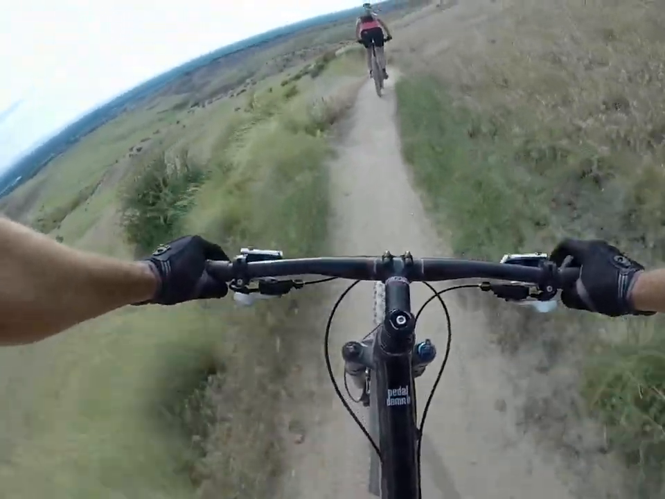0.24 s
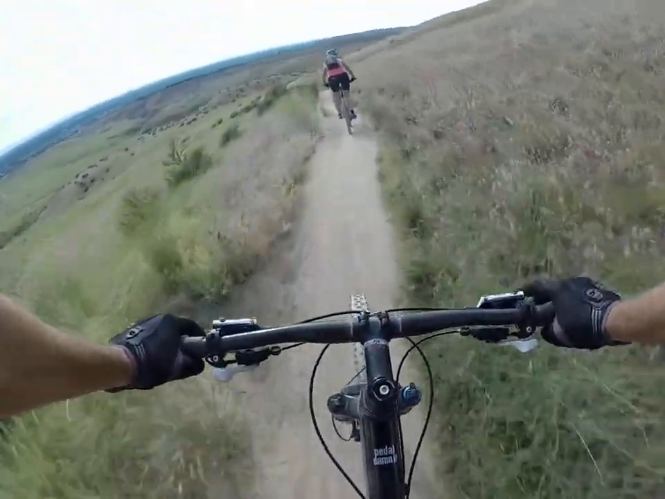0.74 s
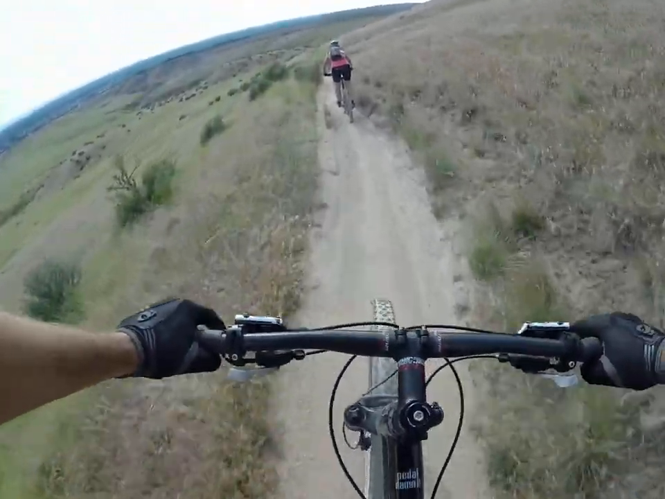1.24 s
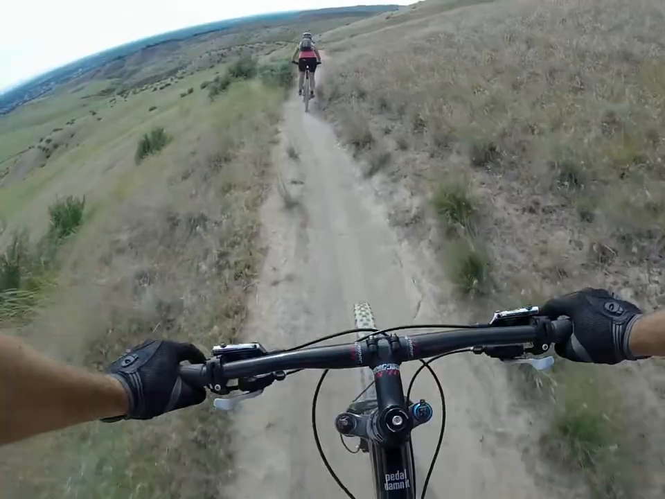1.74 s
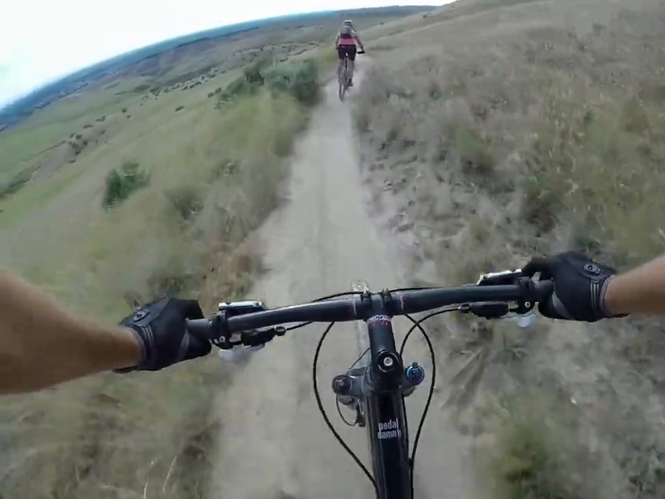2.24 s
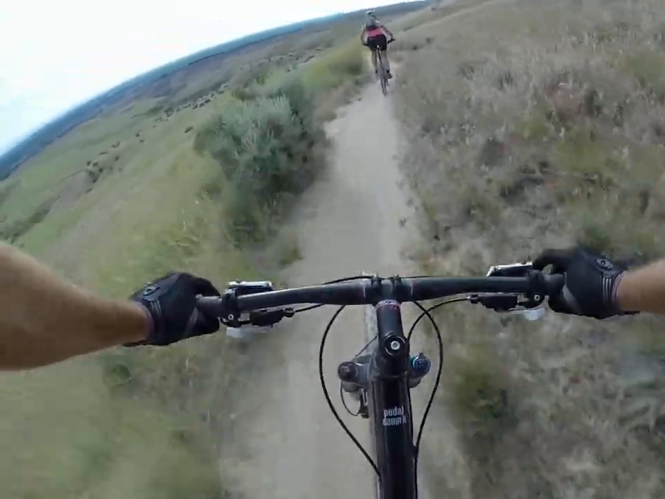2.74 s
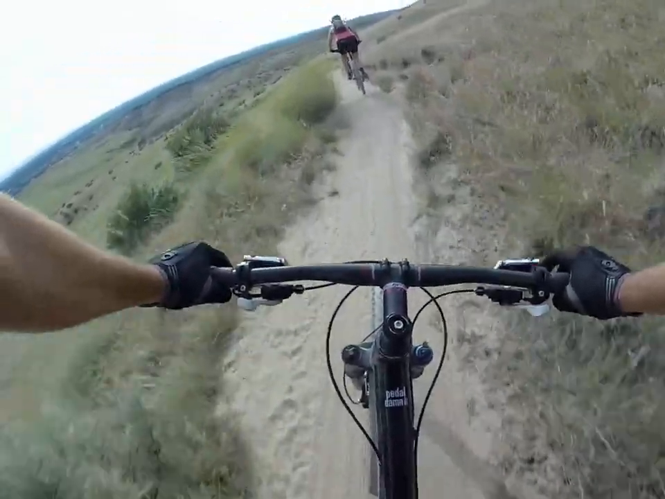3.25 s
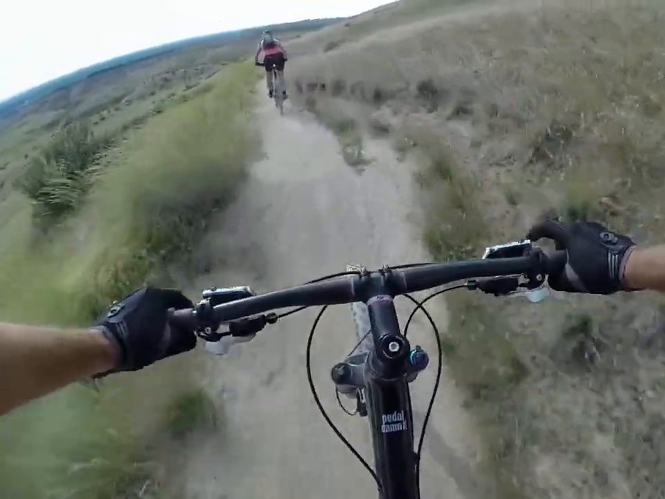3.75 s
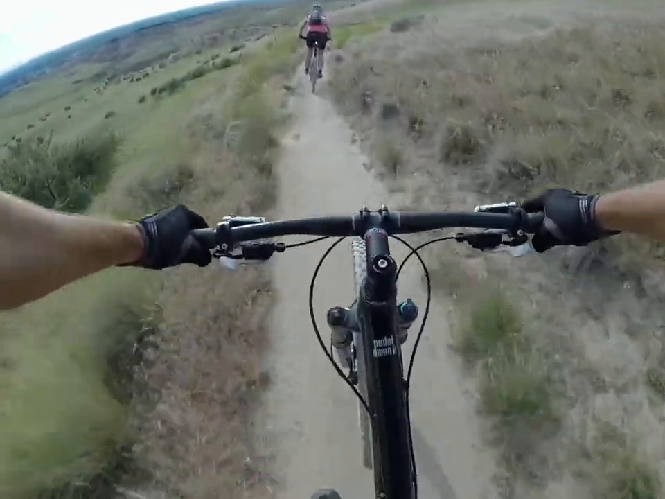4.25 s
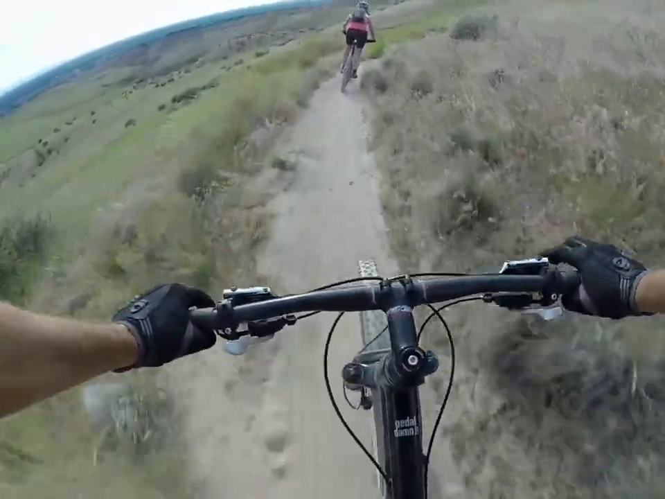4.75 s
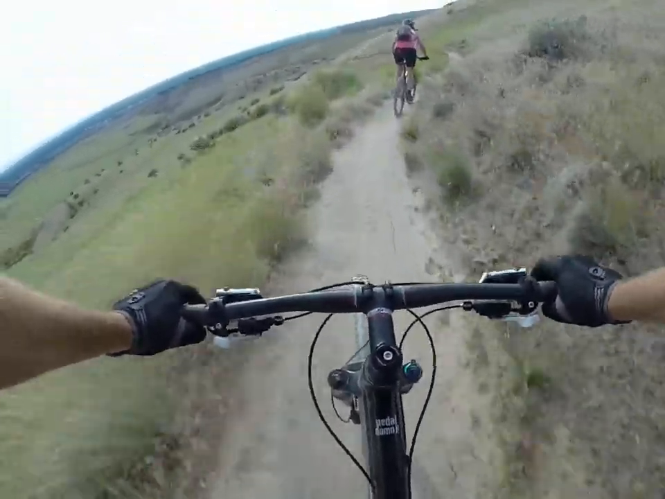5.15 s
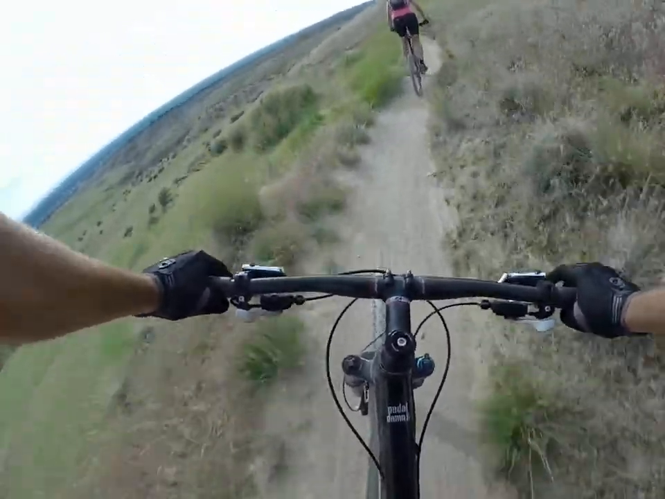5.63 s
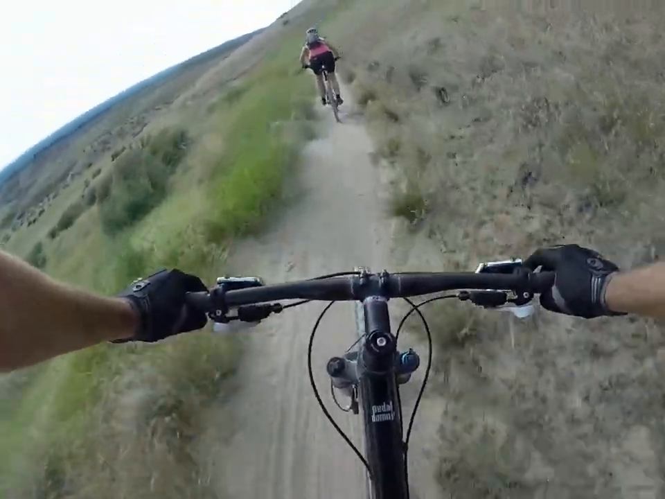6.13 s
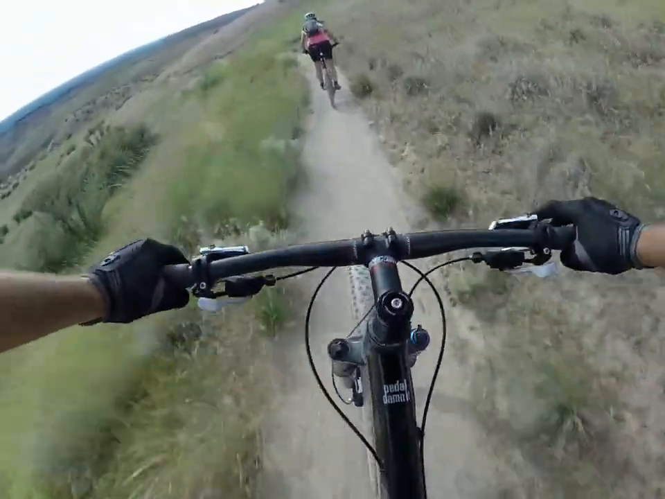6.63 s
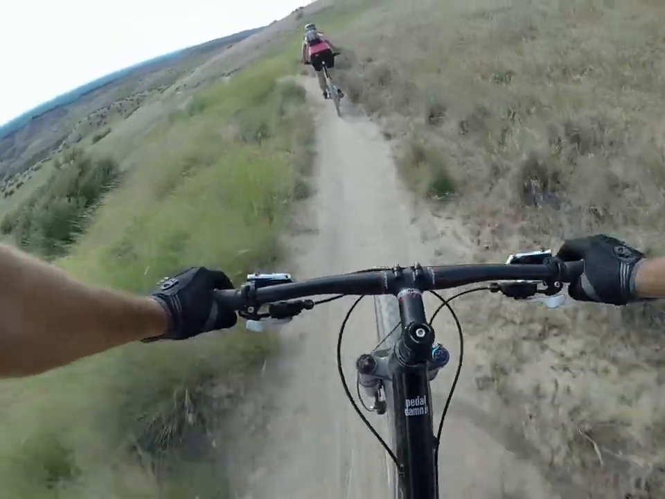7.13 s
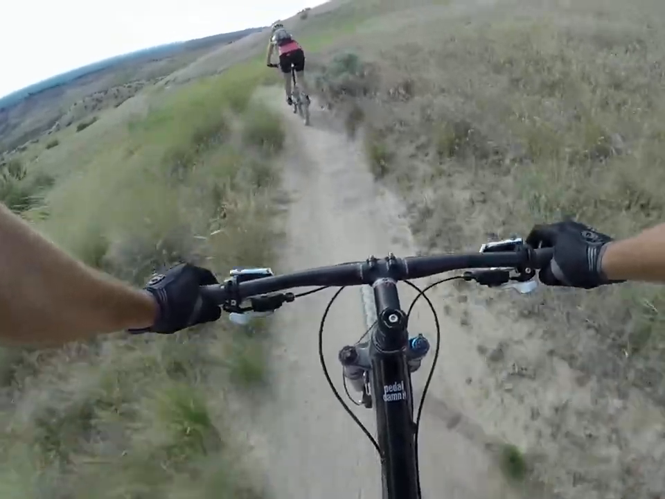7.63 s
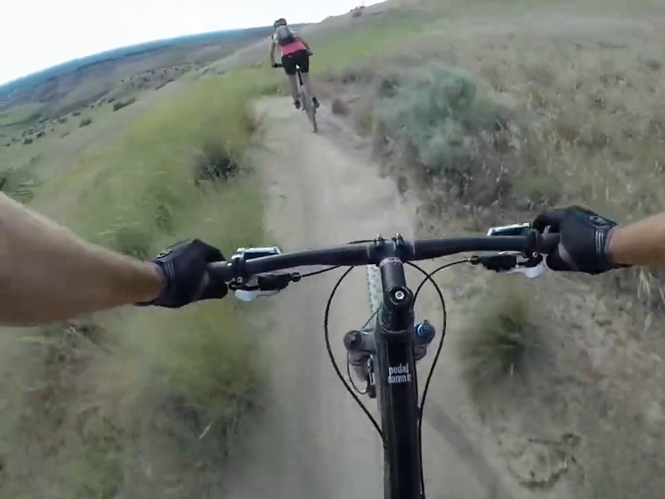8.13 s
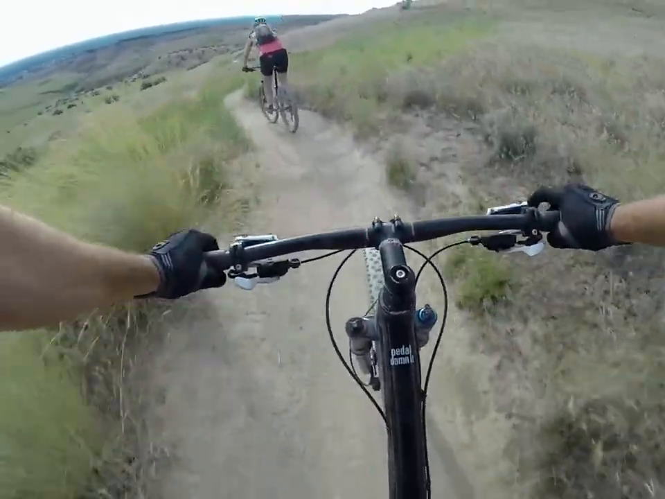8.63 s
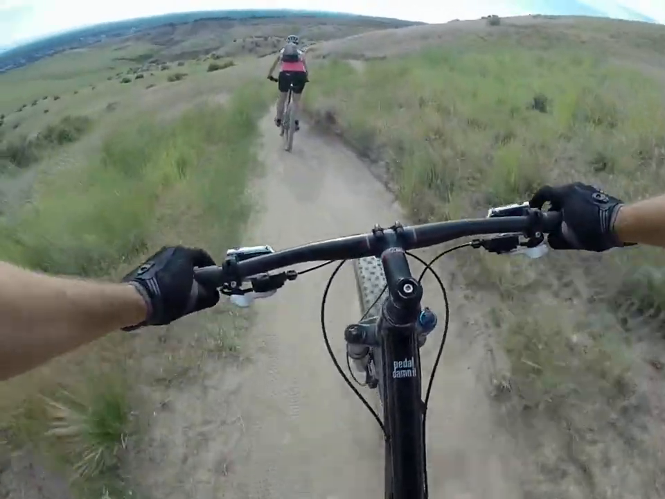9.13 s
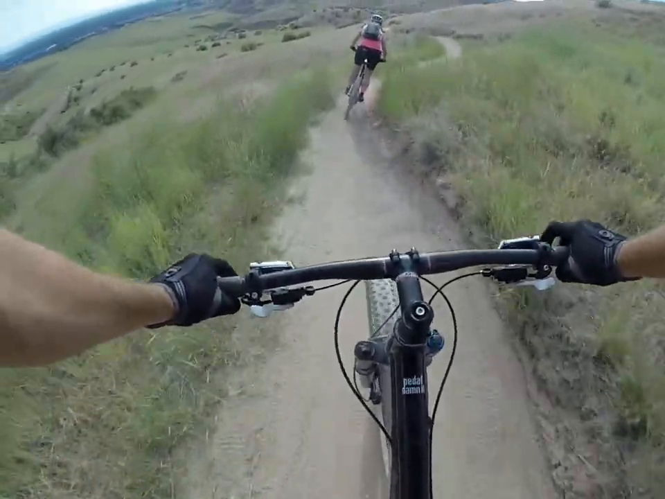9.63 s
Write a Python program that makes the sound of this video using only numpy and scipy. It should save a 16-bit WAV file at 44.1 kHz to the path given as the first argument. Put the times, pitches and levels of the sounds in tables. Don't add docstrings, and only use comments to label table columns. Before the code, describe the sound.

Wind thumps a chest-worn microphone as knobby tyres grind over dry dirt, a freehub ticks fast, and disc brakes squeal in throbbing clusters.

```python
import sys
import numpy as np
from scipy import signal
from scipy.fft import rfft, irfft, next_fast_len
from scipy.io import wavfile

SR = 44100
rng = np.random.default_rng(int(sys.argv[2]) if len(sys.argv) > 2 else 0)


def materialize(psi):
    bounded = np.clip(np.atleast_2d(psi).T, -1, 1)
    quanta = np.round(bounded * 32767).astype(np.int16)
    wavfile.write(sys.argv[1], SR, quanta)


def convert_level_to_amplitude(level_db):
    exponent = np.asarray(level_db, float) / 20
    return 10 ** exponent


N = 435708

# (time [s], rate [clicks/s])
WHEEL_CLICKS = [(0, 77), (1.05, 84), (2.2, 115), (3.2, 79), (3.9, 96), (4.6, 82), (5.1, 94), (5.8, 83),
                (6.6, 78), (7.3, 71), (7.8, 101), (8.5, 80), (9.3, 45), (9.88, 71)]


def rms_one(x):
    return x / np.sqrt(np.mean(x ** 2) + 1e-20)


def in_time(rows):
    s, *columns = np.transpose(rows)
    return [np.interp(np.arange(N) / SR, s, c) for c in columns]


def slow_time():
    return np.arange(0, N + 64, 64) / SR


def every_sample(control):
    return np.interp(np.arange(N) / SR, slow_time(), control)


def drift(rate, count=N):
    r = np.exp(-40 * np.pi * rate / SR)
    noise = rng.standard_normal(count // 20 + 2002)
    slow = signal.lfilter([1], [1, -2 * r, r * r], noise)[2000:]
    return np.interp(np.arange(count) / 20, np.arange(len(slow)), rms_one(slow))


def colour(x, spectrum):
    hz, db = np.transpose(spectrum)
    size = next_fast_len(len(x))
    bins_hz = np.arange(size // 2 + 1) * SR / size + 1e-3
    gain = convert_level_to_amplitude(np.interp(np.log(bins_hz), np.log(hz), db, left=-90, right=-90))
    return rms_one(irfft(rfft(x, size) * gain, size)[:len(x)])


def butter(x, order, hz, kind="low"):
    return signal.sosfilt(signal.butter(order, hz, kind, fs=SR, output="sos"), x)


def ring(clicks, hz, t60):
    r, w = convert_level_to_amplitude(-60 / (t60 * SR)), 2 * np.pi * hz / SR
    return signal.lfilter([0, np.sin(w)], [1, -2 * r * np.cos(w), r * r], clicks + 1e-18)


def resonance(x, hz, width):
    r, w = np.exp(-np.pi * width / SR), 2 * np.pi * hz / SR
    return signal.lfilter([(1 - r * r) / 2, 0, (r * r - 1) / 2], [1, -2 * r * np.cos(w), r * r], x)


def bursts(rows, attack_s, release_s):
    t, out = np.arange(N) / SR, np.zeros(N)
    for s, length, db in rows:
        span = slice(round(s * SR), round((s + length + 8 * release_s) * SR))
        age = t[span] - s
        rise = np.clip(age / attack_s, 0, 1) ** 2
        out[span] += convert_level_to_amplitude(db) * rise * np.exp(-np.maximum(age - length, 0) / release_s)
    return out


def puffs(rows, tone, rise_s):
    shape = np.zeros(N)
    for s, db, t60 in rows:
        t = np.arange(round(t60 * SR)) / SR
        at = round(s * SR)
        shape[at:at + len(t)] += convert_level_to_amplitude(db - 60 * t / t60) * (1 - np.exp(-t / rise_s))
    return shape * colour(rng.standard_normal(N), tone)


def grip_db():
    # (time [s], level [dB])
    bite_rows = [(0.0, -56.5), (0.36, -56), (1.32, -61), (1.51, -57.5), (2.61, -53), (2.92, -54.5),
                 (3.22, -54), (4.37, -61), (4.54, -54.5), (4.81, -57.5), (5.47, -52.5), (6.3, -53.5),
                 (6.63, -57.5), (7.13, -58), (8.2, -49.5), (8.36, -57), (8.72, -55), (9.88, -56.5)]
    # (time [s], change [dB], half length [s])
    bump_rows = [(0.206, 0.5, 0.03), (0.71, 3, 0.081), (0.837, 0.5, 0.035), (1.2, -2.5, 0.091),
                 (1.4, 3.5, 0.059), (2.107, 0, 0.026), (2.522, 1.5, 0.057), (3.604, 2.5, 0.024),
                 (3.858, -4, 0.026), (4.268, -5.5, 0.054), (4.41, 8, 0.057), (4.814, 3, 0.049),
                 (5.434, 0.5, .04), (6.06, 1.5, 0.053), (6.548, 0, 0.034), (6.951, 2.5, 0.23),
                 (7.437, 2.5, 0.061), (8.296, 4.5, 0.066), (8.366, 5.5, 0.016), (8.753, -4, 0.081),
                 (9.555, 2, 0.038)]
    t = slow_time()
    bump_db = sum(db * np.exp(-((t - s) / half) ** 2) for s, db, half in bump_rows)
    return in_time(bite_rows)[0], every_sample(bump_db)


def wind():
    # (time of the top [s], peak [dB], rise [s per 10 dB], fall [s per 10 dB])
    gust_rows = [(0.02, -33, 0.18, 1), (0.9, -25, 0.12, 0.1), (2.319, -28.5, 0.18, 0.12),
                 (3.05, -33.5, 0.22, 0.5), (3.36, -31, 0.27, 0), (3.99, -33, 0.16, 0.3),
                 (4.531, -30.5, 0.066, 0.24), (5.23, -21, 0.21, 0.47), (5.6, -23, 0.39, 0.14),
                 (6.99, -34.5, 0.46, 0.3), (7.55, -31.5, 0.18, 1), (8.06, -18.5, 0.086, 0.2),
                 (8.27, -17.5, 0.15, 0.22), (8.62, -30, 0.15, 0.24), (9.24, -23, 0.23, 0.2),
                 (9.5, -32.5, 0.24, 0.5)]
    # (time [s], level [dB])
    airflow_rows = [(0.0, -44.5), (0.38, -51.5), (0.72, -46), (1.38, -49.5), (1.56, -47), (2.53, -46.5),
                    (3.33, -50.5), (3.58, -48), (5.03, -48.5), (5.61, -46), (6.44, -50), (6.88, -50),
                    (7.24, -55), (7.57, -48), (8.2, -49), (8.56, -51), (9.71, -53.5), (9.88, -51.5)]
    # (frequency [Hz], density [dB/Hz])
    buffet_tone = [(7.1, -16), (12, 1.5), (31, 5), (41, -15), (54, -11.5), (120, -30), (160, -48),
                   (260, -120)]
    rush_tone = [(24, -15.5), (40, -2), (54, -8), (103, -11.5), (283, -21.5), (606, -34.5), (726, -33),
                 (1100, -42.5), (1430, -41.5), (2420, -120)]
    flap_tone = [(40, -23), (60, 5), (120, -13), (200, -25)]
    calm_db = -48
    t = slow_time()
    gusts = 0
    for s, db, rise, fall in gust_rows:
        with np.errstate(divide="ignore", invalid="ignore"):
            away = np.maximum((s - t) / rise, (t - s) / fall)
        gusts = gusts + convert_level_to_amplitude(db - 10 * away) ** 2
    buffet_db = every_sample(10 * np.log10(convert_level_to_amplitude(calm_db) ** 2 + gusts))
    rush_db = in_time(airflow_rows)[0] + 4.2 + 0.7 * grip_db()[1]
    flap_db = -41.0 + 1.1 * (buffet_db + 19.0)
    buffet = colour(rng.standard_normal(N), buffet_tone) * convert_level_to_amplitude(buffet_db + 5.0 + 0.92 * drift(6.0))
    rush = colour(rng.standard_normal(N), rush_tone) * convert_level_to_amplitude(rush_db + 4.0 + 1.54 * drift(11.5))
    flap = colour(rng.standard_normal(N), flap_tone) * convert_level_to_amplitude(flap_db + 2.0 * drift(17))
    return buffet + rush + flap


def tyres():
    # (frequency [Hz], width [Hz], level [dB])
    frame_modes = [(1597, 196, -5), (2270, 286, -0.5), (2694, 280, -8), (3173, 153, -8), (3730, 127, -6.5),
                   (4247, 236, -6.5), (4947, 276, -8), (5730, 360, -11), (7040, 1400, -18),
                   (7780, 170, -45.5)]
    # (frequency [Hz], density [dB/Hz])
    bed_tone = [(400, -14.5), (900, -11.5), (1300, -17), (3000, -9.5), (6600, -18), (9000, -43),
                (10500, -41), (12000, -60)]
    grind_mean_db, grind_follows = -56.5, 0.45
    grind_db_per_octave = 3
    slow_db, bump_db = grip_db()
    speed = in_time(WHEEL_CLICKS)[0]
    grind_db = grind_mean_db + grind_follows * (slow_db - slow_db.mean())
    grind_db = grind_db + grind_db_per_octave * np.log2(speed / speed.mean()) + bump_db + 0.54 * drift(4.7)
    hiss_db = slow_db + bump_db - 1.5 + 0.56 * drift(4)
    roughness = drift(29)
    sizes = convert_level_to_amplitude(3.5 * np.minimum(rng.exponential(1, N), 4.5)) * rng.choice([-1, 1], N)
    grains = 0.5 * rms_one((rng.random(N) < 1500 / SR) * sizes)
    grit = (rng.standard_normal((2, N)) + grains) * convert_level_to_amplitude(0.92 * roughness)
    low, high = 0, 0
    for k, (hz, width, db) in enumerate(frame_modes):
        mode = resonance(grit[k % 2], hz, width) * convert_level_to_amplitude(db + 1.5 * drift(15.0))
        if k < 4:
            low = low + mode
        else:
            high = high + mode
    high = butter(high, 4, 8300)
    low = butter(low, 2, 6000)
    bed = colour(rng.standard_normal(N), bed_tone) * convert_level_to_amplitude(-16 + 0.5 * roughness)
    grind = convert_level_to_amplitude(grind_db + 23) * (low + butter(bed, 2, 3400))
    hiss = convert_level_to_amplitude(hiss_db + 18.5) * (high + butter(bed, 2, 3400, "high"))
    return grind + hiss


def freehub():
    # (frequency [Hz], level [dB], t60 [s])
    pawl_modes = [(5785, 3, 0.0085), (7480, 8, 0.0057), (8350, -5.5, 0.0093), (9310, -8, 0.0079),
                  (11170, -14, 0.0054)]
    teeth = np.cumsum(in_time(WHEEL_CLICKS)[0] * (1 + 0.02 * drift(30))) / SR
    clicks = (np.diff(np.floor(teeth), prepend=0) > 0) * convert_level_to_amplitude(2.2 * rng.standard_normal(N))
    slide = np.exp(-1 / (0.0013 * SR))
    burst = signal.lfilter([1], [1, -2 * slide, slide ** 2], clicks) * rng.standard_normal(N)
    pawls = sum(convert_level_to_amplitude(db) * ring(ring(burst, hz, t60), hz, t60) for hz, db, t60 in pawl_modes)
    return convert_level_to_amplitude(sum(grip_db()) - 7.5) * rms_one(pawls)


def cassette():
    # (start [s], length [s], level [dB])
    squeak_rows = [(0.24, 0.058, -55), (0.63, .06, -60), (0.888, 0.084, -55), (1.578, 0.035, -43),
                   (1.635, .04, -54), (1.69, .055, -48.5), (1.815, .11, -45), (1.945, 0.046, -48.5),
                   (2.018, 0.059, -48), (2.08, .03, -55), (5.66, 0.17, -55.5), (6.895, .025, -50)]
    squeak_hz, sweep_hz, slips_per_s = 3176, 230, 68
    slip = np.cumsum(slips_per_s * (1 + 0.17 * drift(20))) / SR % 1
    loose = bursts(squeak_rows, attack_s=0.008, release_s=0.013)
    swell = np.sin(np.pi * slip) * convert_level_to_amplitude(2.0 * drift(40))
    pitch_hz = squeak_hz + sweep_hz * (slip - 0.5) + 35 * drift(25.1)
    squeak = rms_one(swell * np.sin(2 * np.pi * np.cumsum(pitch_hz) / SR))
    return convert_level_to_amplitude(0.2) * loose * squeak


def scuffs():
    # (time [s], level [dB], t60 [s])
    scuff_rows = [(.752, -43, 0.041), (.984, -39, .04), (1.296, -48, 0.16), (2.09, -40.5, 0.11),
                  (2.243, -39.5, 0.085), (3.62, -47, .06), (4.345, -43, 0.057), (4.402, -38, 0.018),
                  (4.43, -30, 0.02), (7.43, -38, 0.081), (8.385, -38, 0.065), (8.465, -38, 0.05),
                  (9.498, -45, 0.092)]
    # (frequency [Hz], density [dB/Hz])
    scuff_tone = [(500, -10), (1200, -6), (2300, 1), (4000, -6), (6500, -14)]
    return puffs(scuff_rows, scuff_tone, rise_s=0.00053)


def brakes():
    # (start [s], length [s], frequency [Hz], drag [dB], fundamental [dB])
    pull_rows = [
        (2.439, 0.46, 731.5, -53, -58),
        (3.147, 0.36, 779, -54.5, -55),
        (6.1, 0.38, 780, -55.5, -56.5),
        (7.64, 0.83, 785, -51, -57),
        (8.468, 0.575, 730, -54, -56.5),
        (9.047, 0.46, 780, -54, -57.5),
    ]
    # (time [s], frequency [Hz])
    squeezes = [
        [(2.44, 1480), (2.55, 1470), (2.62, 1455), (2.7, 1430), (2.76, 1500), (2.87, 1480)],
        [(3.15, 1545), (3.3, 1562), (3.4, 1545), (3.53, 1575)],
        [(6.14, 1560), (6.25, 1555), (6.33, 1570), (6.48, 1570)],
        [(7.7, 1555), (7.8, 1545), (7.9, 1562), (7.95, 1550), (8.03, 1585), (8.13, 1588), (8.19, 1535),
         (8.27, 1570), (8.4, 1590)],
        [(8.5, 1474), (8.6, 1450), (8.635, 1468), (8.7, 1456), (8.735, 1463), (8.77, 1443), (8.83, 1440),
         (8.9, 1455), (9.0, 1500)],
        [(9.07, 1555), (9.19, 1535), (9.26, 1590), (9.33, 1570), (9.48, 1580)],
    ]
    # (start [s], length [s], 2nd partial [dB], 3rd above 2nd [dB])
    grab_rows = [(2.51, 0.057, -40.5, -18), (2.58, 0.026, -34, -20), (2.63, 0.036, -37.5, -8),
                 (2.741, 0.014, -49, -14), (6.17, 0.094, -51, -1), (6.255, 0.033, -46, -6),
                 (6.299, 0.016, -39, -20), (6.36, 0.029, -52, 0), (7.781, 0.071, -45.5, -14),
                 (7.865, 0.048, -35.5, 1.5), (7.954, 0.052, -30, -0.5), (8.013, 0.036, -38, 5.5),
                 (8.048, 0.056, -27, -11), (8.11, 0.05, -28, -3.5), (8.177, 0.023, -33.5, -3.5),
                 (8.217, 0.063, -39, -2.5), (8.272, 0.04, -35, -2), (8.33, 0.013, -46, -10),
                 (8.518, 0.036, -43, -19), (8.547, 0.044, -35, -12), (8.608, 0.053, -30, -12),
                 (8.683, 0.05, -30.5, -5.5), (8.744, 0.061, -34.5, -14), (8.822, 0.037, -44, -3),
                 (8.87, 0.017, -47, -10), (8.928, 0.014, -46, -10), (9.095, 0.06, -46, -2),
                 (9.185, .02, -46, -16), (9.225, 0.059, -42.5, -8), (9.33, 0.027, -51, -10)]
    # (start [s], length [s], level [dB])
    hum_rows = [(2.48, .05, -50), (2.545, .035, -47), (2.6, .08, -49.5), (2.745, 0.032, -49),
                (3.19, .05, -54), (3.235, .06, -49), (3.31, .1, -56), (3.44, .04, -54), (6.19, .07, -56),
                (6.265, .065, -48), (7.72, .12, -54), (7.86, .04, -50), (7.91, .015, -45),
                (7.955, 0.025, -41), (8.005, .03, -43), (8.05, .045, -45), (8.115, 0.033, -45),
                (8.195, 0.066, -43), (8.31, 0.014, -50), (8.53, .05, -46), (8.59, .022, -41),
                (8.63, 0.038, -45), (8.68, .035, -41), (8.745, 0.018, -46), (8.79, 0.064, -50),
                (8.9, .13, -54), (9.07, .05, -53), (9.15, .03, -50), (9.235, 0.034, -51), (9.33, .07, -54)]
    # (multiple of the fundamental, level under a loud 3rd [dB])
    upper_partials = [(4, -12), (5, -22.5), (6, -25), (7, -29), (8, -32), (9, -33), (10, -34)]
    # (frequency [Hz], width [Hz], lift of a partial that falls on it [dB])
    rotor_modes = [(3150, 180, 2.5), (3920, 180, 3.5), (5110, 140, 14)]
    # (frequency [Hz], density [dB/Hz])
    pad_tone = [(1500, -12), (2500, -2), (6000, -6), (9000, -10), (12000, -22), (14500, -34)]
    attack_s, release_s = 0.0125, 0.011
    drag_third_db, wander = -5.5, 0.00876
    out = np.zeros(N)
    second_throb = bursts([row[:3] for row in grab_rows], attack_s, release_s)
    third_rows = [(s, length, db + rel) for s, length, db, rel in grab_rows]
    third_throb = bursts(third_rows, attack_s, release_s)
    hum = bursts(hum_rows, attack_s, release_s)
    for (s, length, hz, drag_db, first_db), pitch in zip(pull_rows, squeezes):
        span = slice(round(s * SR), round((s + length) * SR))
        count = span.stop - span.start
        squeeze = signal.windows.tukey(count, 0.35)
        rough = 0.62 if hz < 755 else 1
        tremble = wander * drift(29.4, count=count)
        phase = np.pi * np.cumsum(in_time(pitch)[0][span] * (1 + tremble * rough)) / SR
        first = 20 * np.log10(convert_level_to_amplitude(first_db) + hum[span])
        second = 20 * np.log10(convert_level_to_amplitude(drag_db) + second_throb[span])
        third = 20 * np.log10(convert_level_to_amplitude(drag_db + drag_third_db) + third_throb[span])
        bite = np.minimum(0.53 * (third + 33), 0)
        levels = [first, second, third] + [third + bite + db for _, db in upper_partials]
        for k, db in enumerate(levels):
            depth = min(0.36 + 0.07 * k, 0.8) * (rough if k else 1)
            beat = drift(32 + 7.8 * k, count=count) + 1j * drift(30 + 7.3 * k, count=count)
            chatter = 1 + depth * beat
            partial_hz = (k + 1) * hz
            lift_db = sum(lift / (1 + ((partial_hz - mode) / width) ** 2) for mode, width, lift in rotor_modes)
            tone = np.imag(chatter * np.exp(1j * (k + 1) * phase))
            out[span] += convert_level_to_amplitude(db + lift_db + 0.6) * squeeze * tone
    return out + convert_level_to_amplitude(-23) * third_throb * colour(rng.standard_normal(N), pad_tone)


def twigs():
    # (time [s], peak [dB], brightness above 9 kHz [dB])
    tick_rows = [(3.1253, -42, 0), (4.392, -28, 1), (4.441, -28, -1), (4.5792, -44, -3), (4.8715, -28, -1),
                 (4.9646, -33, 0), (5.0906, -34, -3), (5.117, -39, 1), (5.231, -38, 0), (5.5657, -29, -2),
                 (8.2216, -29.5, 3), (8.308, -22.5, -1), (8.3554, -24, 3), (8.565, -34.5, 4),
                 (8.7405, -39, 3), (9.1471, -28, 4), (9.4165, -46, 0), (9.54, -32, -7)]
    # (frequency [Hz], density [dB/Hz])
    tick_tone = [(2500, -2), (5800, 8.5), (7400, 7), (9500, -7), (12000, -10), (15300, -19)]
    puff = colour(rng.standard_normal(N), tick_tone)
    out = np.zeros(N)
    for bright, kind in enumerate(("low", "high")):
        rows = [(s, 0.0062, db - 14.0 + bright * lift) for s, db, lift in tick_rows]
        out += bursts(rows, attack_s=0.001, release_s=0.0022) * butter(puff, 3, 9000, kind)
    return out


def stones():
    # (time [s], peak [dB], frequency [Hz], t60 [s])
    stone_rows = [(4.024, -26, 1630, 0.015), (4.382, -32, 2090, 0.025), (4.402, -22.5, 2280, 0.014),
                  (4.4125, -25, 1600, .012), (4.421, -29, 2290, .02), (4.431, -22, 2110, 0.014),
                  (4.432, -29, 700, .01), (4.784, -24.5, 2290, 0.017), (5.443, -29, 1530, 0.038),
                  (5.459, -28, 2150, 0.016), (7.0623, -19.5, 2164, 0.018), (7.2065, -29, 2520, 0.018),
                  (7.439, -40, 2240, 0.018), (9.498, -35, 2345, 0.025), (9.499, -36, 1450, .03)]
    out = np.zeros(N)
    for s, db, hz, t60 in stone_rows:
        t = np.arange(round(t60 * SR)) / SR
        at = round(s * SR)
        pair = np.sin(2 * np.pi * hz * t) + 0.39 * np.sin(2 * np.pi * 1.17 * hz * t)
        out[at:at + len(t)] += convert_level_to_amplitude(db - 60 * t / t60) * (1 - np.exp(-t / 0.0004)) * pair
    return out


def jolts():
    # (time [s], peak [dB], start frequency [Hz], time to silence [s], time to half pitch [s])
    jolt_rows = [
        (4.4005, -1, 115, 0.045, 0.0056),
        (4.42, 1.5, 18, 0.09, .9),
        (4.426, -16, 100, 0.044, 0.028),
        (4.49, -17, 22.4, .12, .5),
        (7.0593, -16, 208, 0.023, 0.0057),
        (7.0607, -20.5, 320, 0.013, 0.0073),
        (5.406, -24.5, 238, 0.02, 0.022),
        (8.29, -26.5, 110, 0.12, .2),
        (8.4, -24, 84, 0.11, 0.1),
    ]
    snub = 3.34
    out = np.zeros(N)
    for s, db, hz, t60, sag in jolt_rows:
        t = np.arange(round(t60 * SR)) / SR
        at = round(s * SR)
        swing = np.sin(2 * np.pi * hz * sag * np.log1p(t / sag))
        out[at:at + len(t)] -= convert_level_to_amplitude(db - 60 * (t / t60) ** snub) * (1 - np.exp(-t * hz * 1.5)) * swing
    return out


def crunches():
    # (time [s], level [dB], t60 [s])
    crunch_rows = [
        (4.401, -18, 0.042),
        (4.412, -27, 0.087),
        (4.4305, -18.5, 0.03),
        (7.061, -26.5, 0.028),
        (5.6, -34.5, 0.15),
        (7.44, -29, 0.039),
    ]
    # (frequency [Hz], density [dB/Hz])
    crunch_tone = [(90, 3), (180, 9), (500, -4.5), (1000, -10.5), (2300, -23), (4000, -56)]
    return puffs(crunch_rows, crunch_tone, rise_s=0.00092)


def scene():
    ride = wind() + tyres() + freehub() + cassette()
    strikes = scuffs() + twigs() + stones() + jolts() + crunches()
    return (ride + brakes() + strikes)[None]


def band_limit(x):
    return signal.sosfilt(signal.butter(12, 15610, fs=SR, output="sos"), x)


def record(dry):
    # (frequency [Hz], density [dB/Hz])
    self_noise_tone = [(7000, 1), (10000, -1), (11500, -6), (13500, -5), (15400, -7)]
    hiss = convert_level_to_amplitude(-74.0) * colour(rng.standard_normal(N), self_noise_tone)
    top = signal.ellip(12, 0.5, 35, 15280, fs=SR, output="sos")
    mix = signal.sosfilt(top, 0.9 * np.tanh(dry / 0.9) + hiss)
    return band_limit(mix)


dry = scene()
out = record(dry)
materialize(out)
```